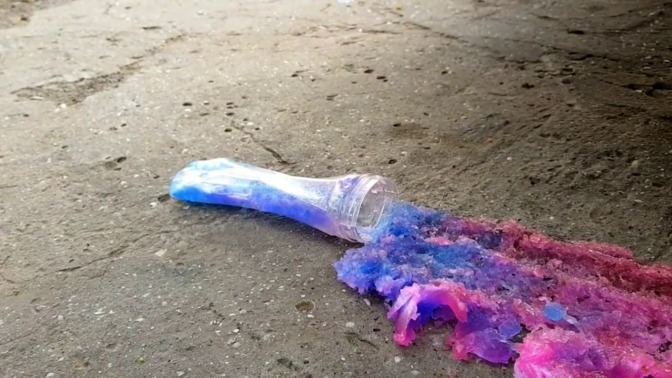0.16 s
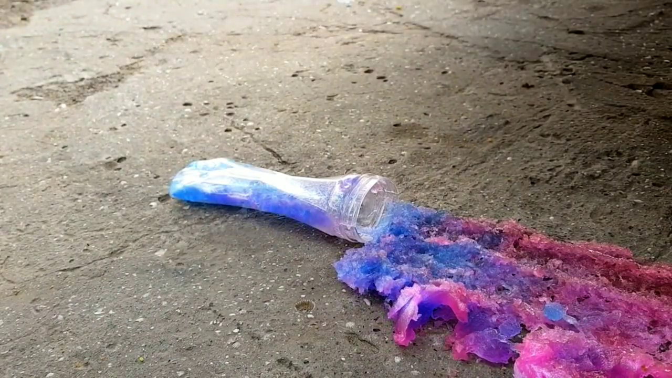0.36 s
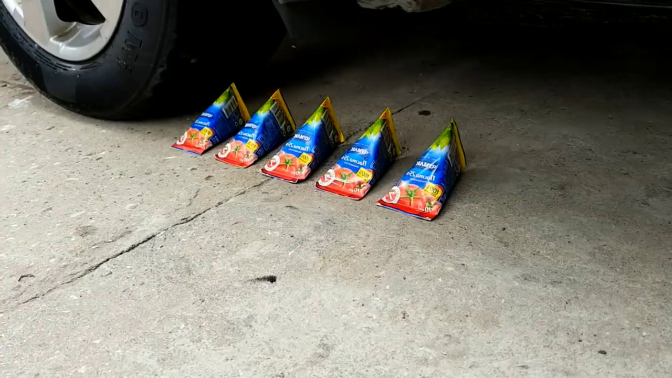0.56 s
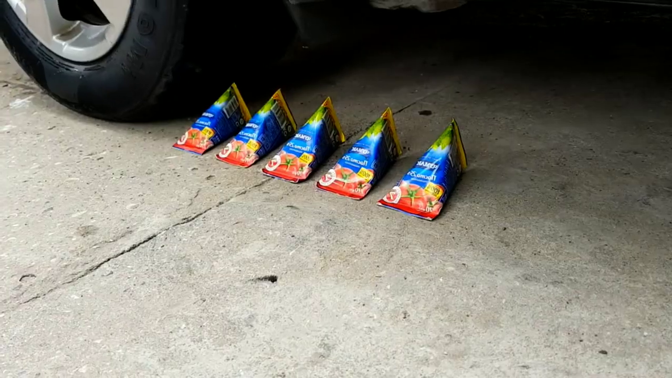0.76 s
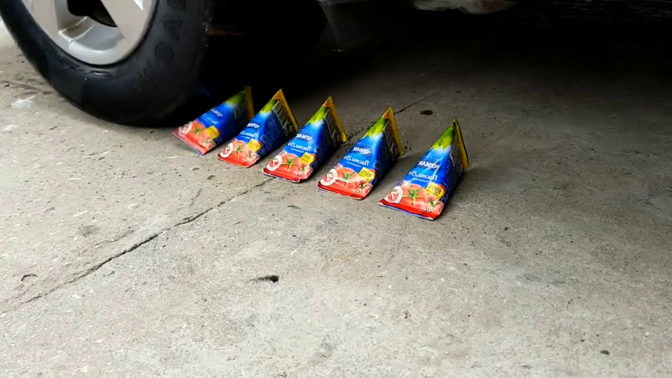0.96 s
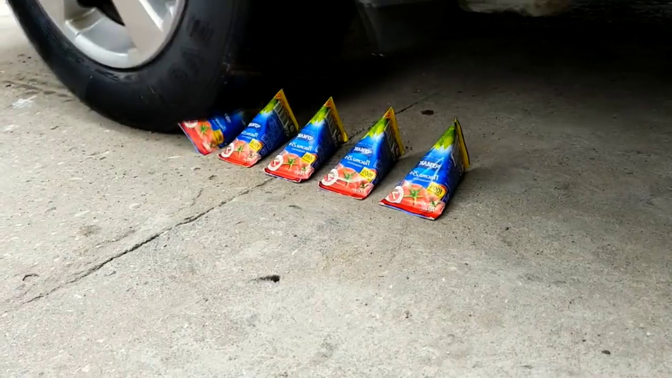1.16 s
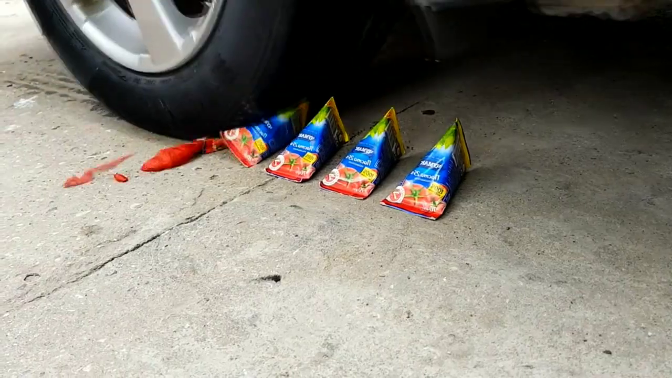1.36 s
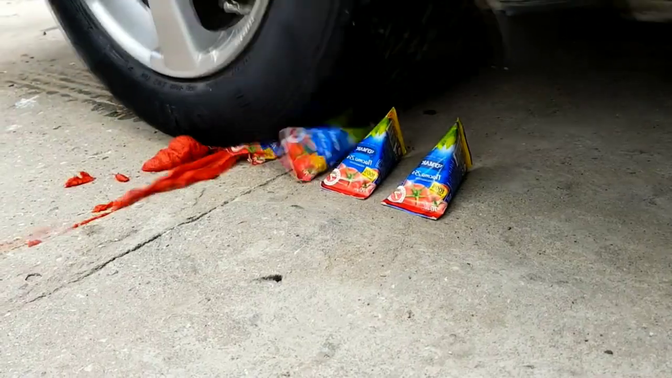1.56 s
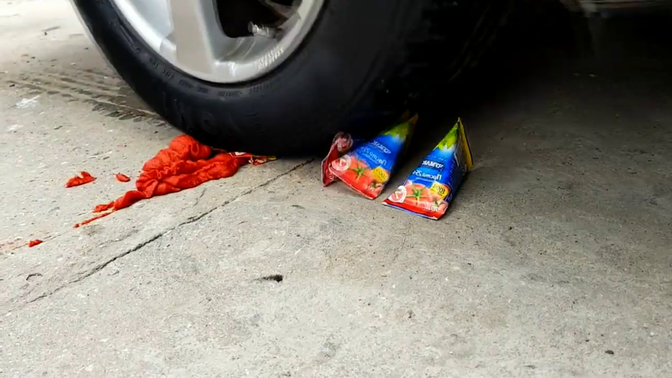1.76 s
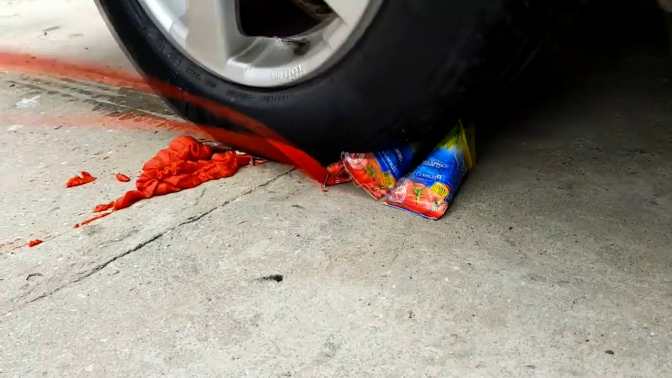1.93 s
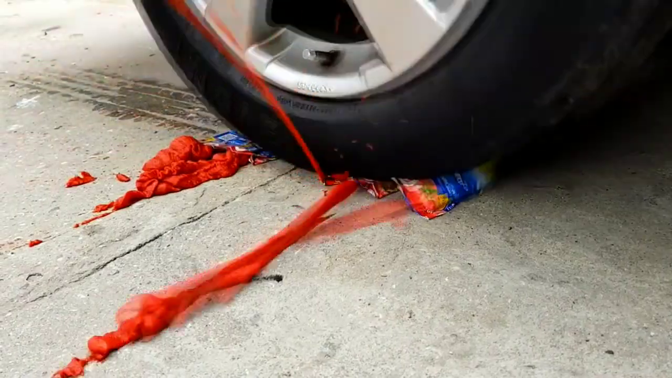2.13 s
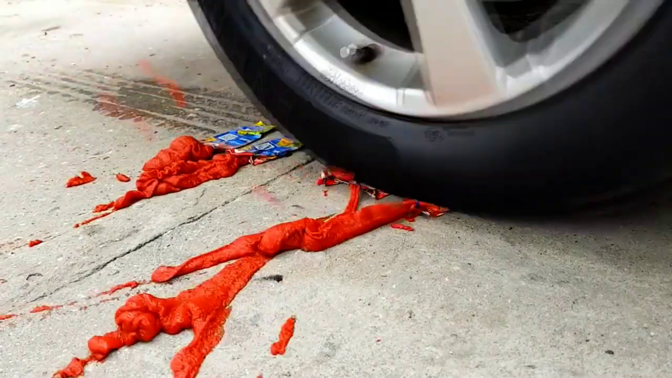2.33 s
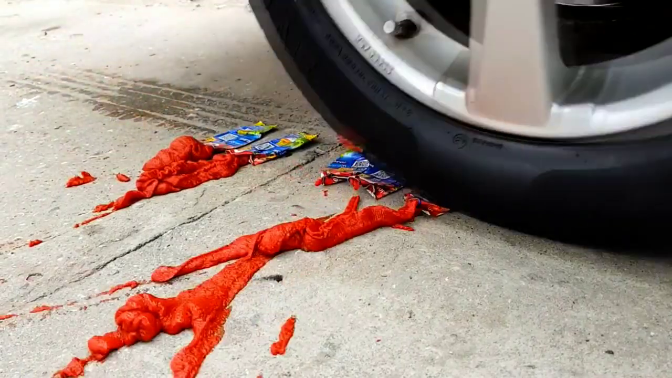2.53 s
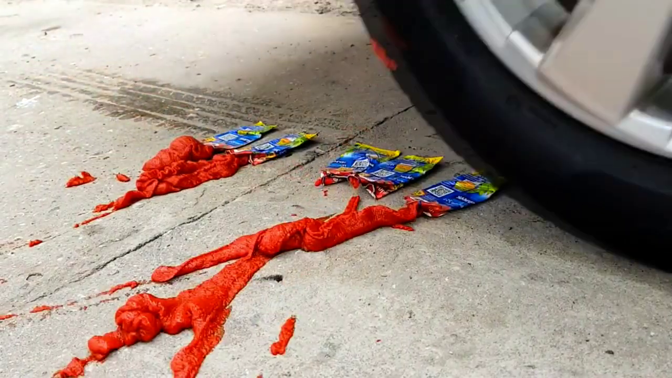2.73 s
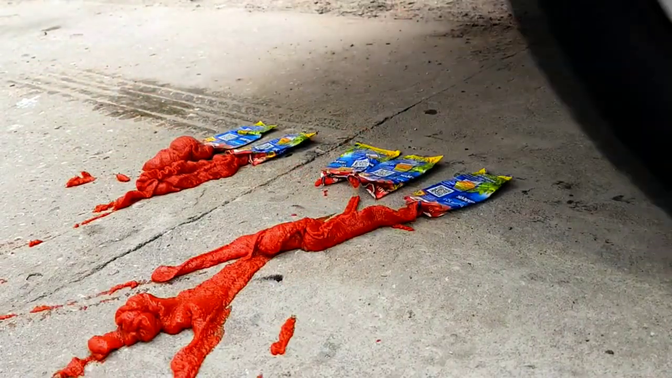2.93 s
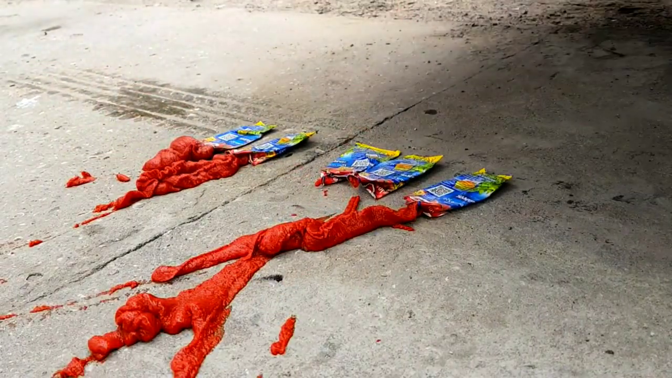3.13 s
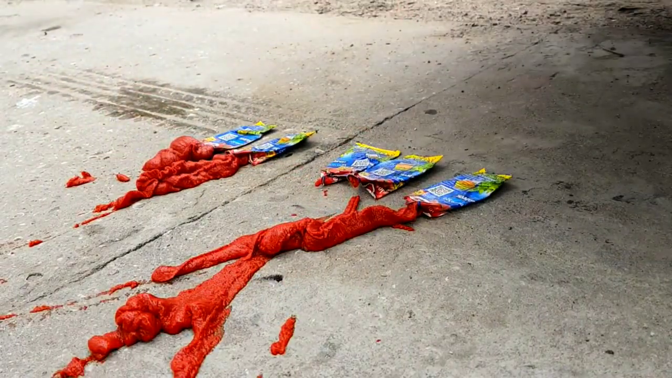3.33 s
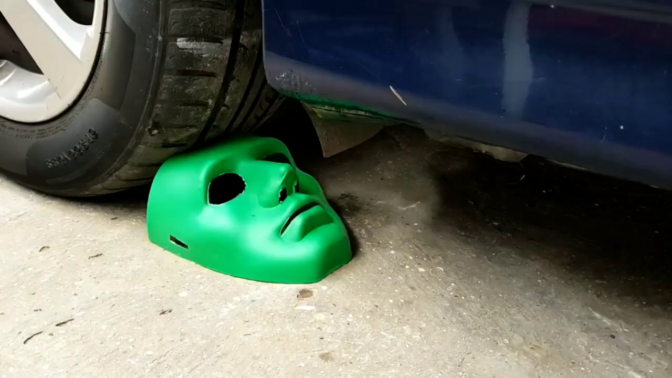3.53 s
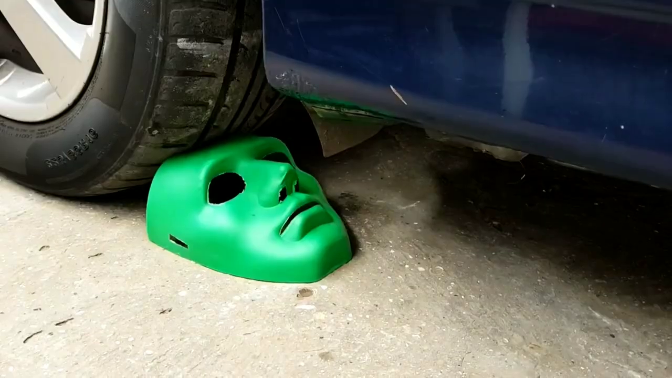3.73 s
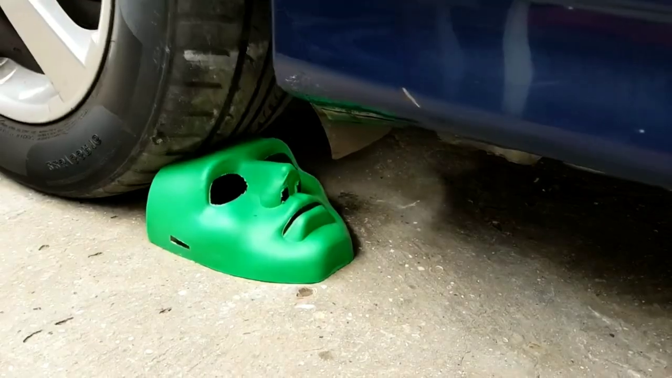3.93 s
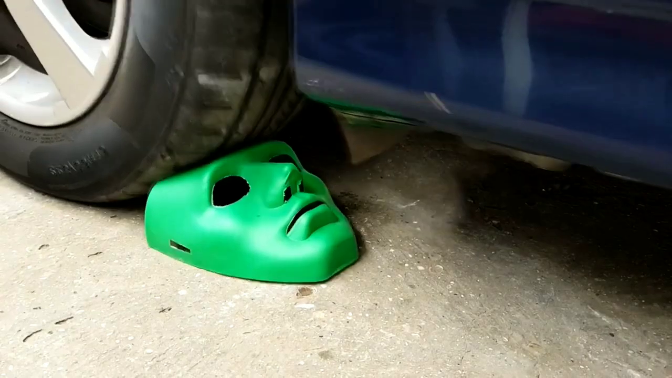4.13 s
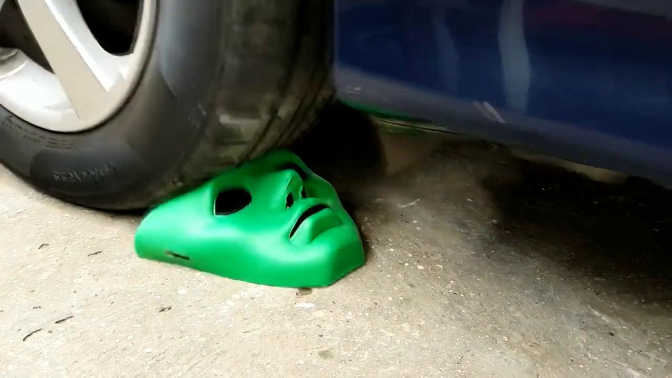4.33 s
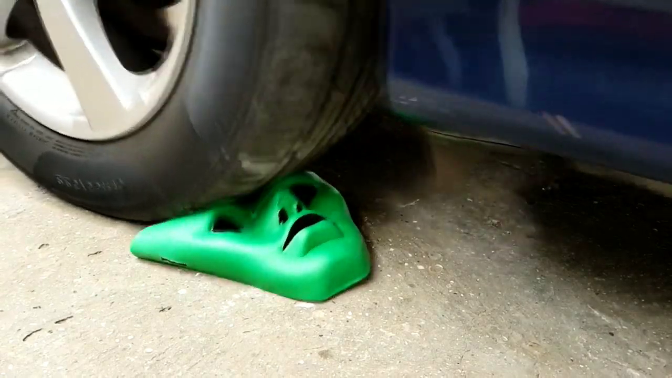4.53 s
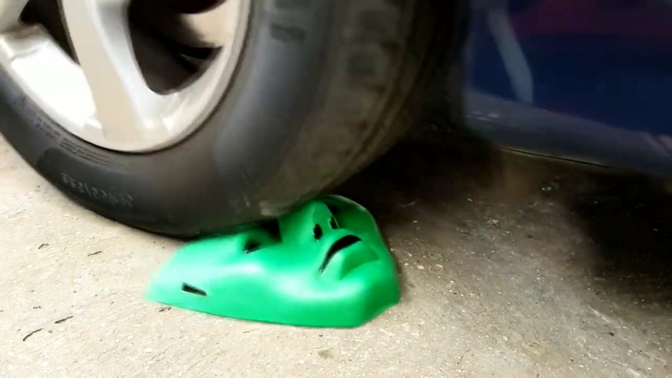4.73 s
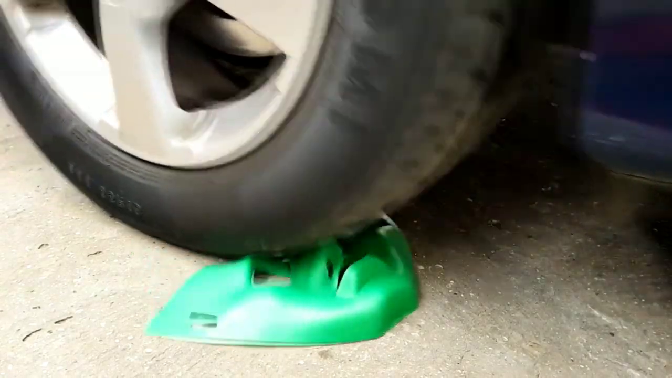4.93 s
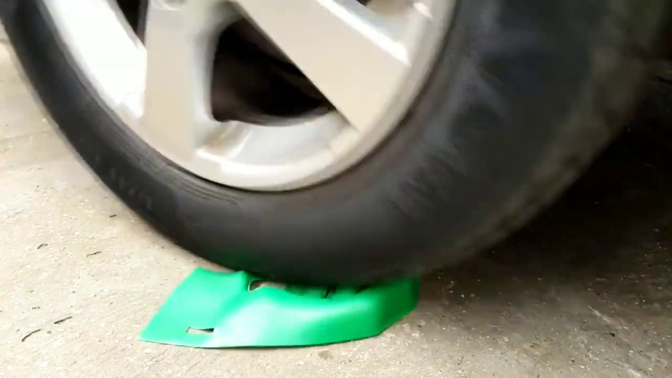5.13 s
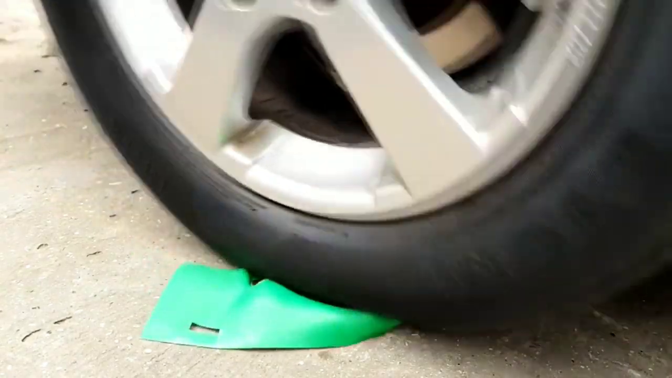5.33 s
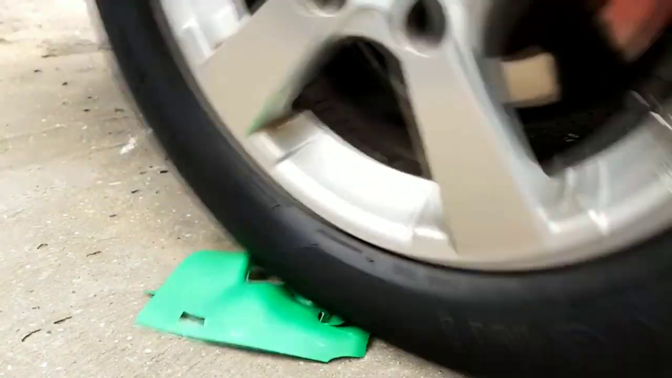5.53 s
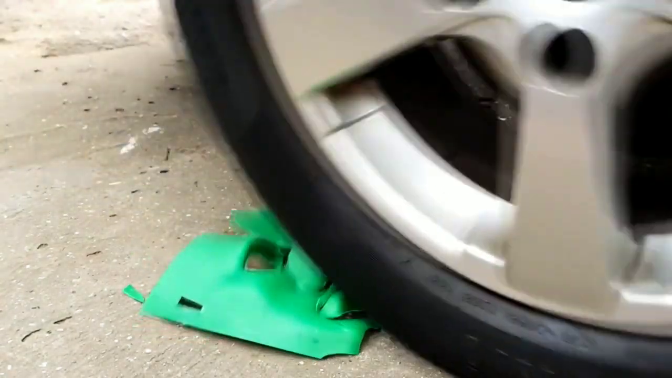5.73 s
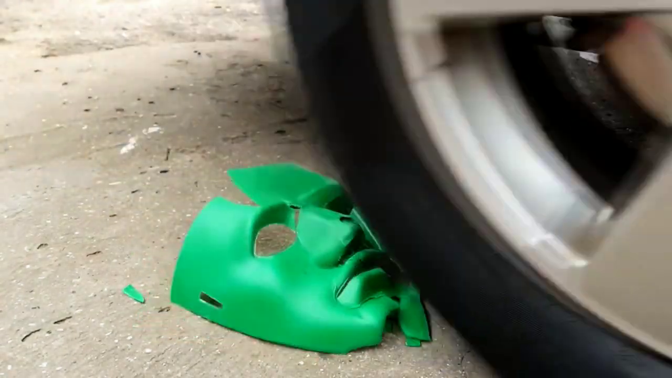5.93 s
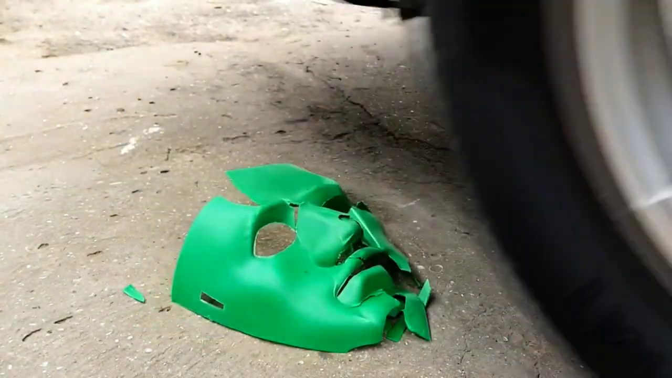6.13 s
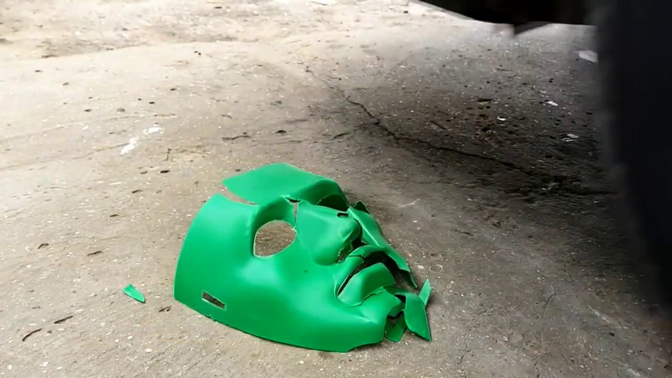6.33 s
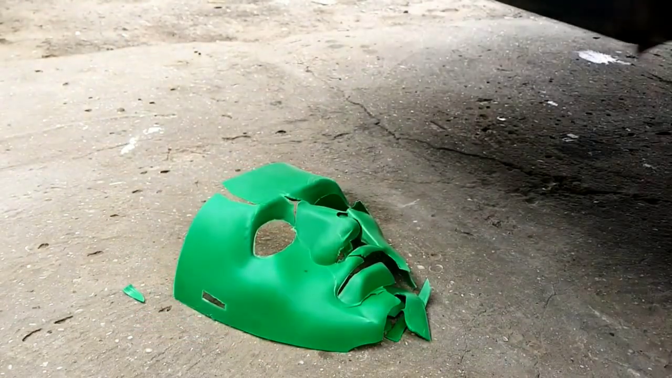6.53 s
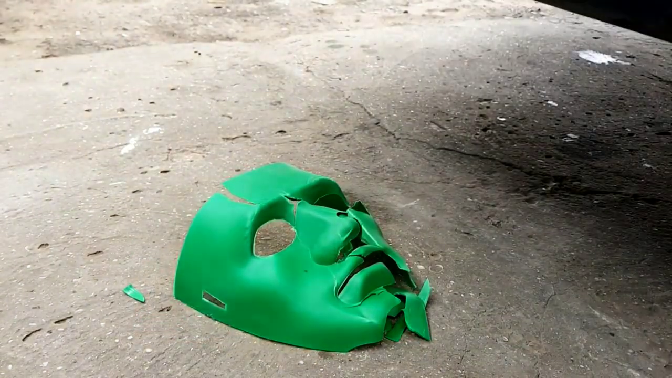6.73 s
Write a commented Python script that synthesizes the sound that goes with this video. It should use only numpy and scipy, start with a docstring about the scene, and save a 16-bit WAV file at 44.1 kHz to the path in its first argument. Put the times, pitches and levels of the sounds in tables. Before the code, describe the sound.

Close to the ground on concrete, a car creeps past with a low idling hum and soft tyre rumble. Foil packets tick, squelch and pop, one bursting with a duller thump. After an abrupt cut, a hard plastic mask scrapes, groans under load, then breaks in a loud, hollow volley of cracks and thumps. The wheel rolls off, the car fades, and one dry plastic click remains.

```python
"""On concrete, a car creeps along with its engine idling while its tyre crushes things laid in the way.
A row of sauce packets crinkles and pops: damped mode clusters and dense click trains, filtered.
A thin plastic mask then buckles, crunches and splits in a volley of cracks over thumping panels.
The tyre drops off it and rings, and a last piece of plastic clicks, both as sums of damped modes.
Beneath, in three shots cut together, lie the engine's sine orders and shaped noise of road and tread."""
import sys
import numpy as np
from scipy import signal
from scipy.fft import rfft, irfft, next_fast_len
from scipy.io import wavfile
from scipy.ndimage import map_coordinates

SR = 44100
rng = np.random.default_rng(int(sys.argv[2]) if len(sys.argv) > 2 else 0)


def file_out(sig):
    """Save sig as 16-bit WAV at sys.argv[1]."""
    # one column per channel
    cols = np.atleast_2d(sig).T
    # limit, then scale
    lim = np.clip(cols, -1, 1)
    pcm = np.round(lim * 32767).astype(np.int16)
    wavfile.write(sys.argv[1], SR, pcm)


N = 298998
TIME = np.arange(N) / SR

# The mask cracking. Each row: time in seconds, relative level in dB, pitch of the knock in Hz,
# brightness in dB, duration of the running split in seconds, relative level in dB of the thump
# of the panel snapping through, pitch of that thump in Hz at its onset.
CRACKS = [(4.056, -28.5, 1011, 0.5, 0.0045, -22.5, 590), (4.1185, -24.5, 1002, -7.5, 0.009, -17.5, 594),
          (4.208, -9, 871, -13, 0.002, -14, 720), (4.286, -21, 1388, -3.5, 0.0021, -25.5, 705),
          (4.294, -32, 1710, 13.5, 0, -21.5, 700), (4.323, -23.5, 1170, -5, 0.0019, -20.5, 670),
          (4.333, -20.5, 1630, -8.5, 0.0015, -19, 560), (4.342, -19, 1630, -7, 0.00036, -21, 686),
          (4.351, -21, 1180, -5.5, 0.0002, -9.5, 780), (4.357, -21.5, 1150, -2.5, 0.0052, -10.5, 644),
          (4.379, -22, 1202, -11.5, 0.018, -21.5, 600), (4.396, -13.5, 1185, -6.5, 0, -8, 664),
          (4.408, -12, 2300, -6.5, 0.0023, -4, 680), (4.419, -22, 1790, -9, 0.0029, -13.5, 575),
          (4.436, -17, 1190, -11.5, 0.0046, -17, 549), (4.442, -23.5, 1180, -12.5, 0.00071, -17, 506),
          (4.456, -19, 1280, -13, 0.00061, -17, 620), (4.473, -26.5, 1198, -10, 0.005, -17, 597),
          (4.492, -27.5, 1197, -8.5, 0.00089, -16.5, 548), (4.526, -34.5, 1506, -5.5, 0.002, -25, 717),
          (4.546, -32.5, 1191, -1.5, 0, -30.5, 718), (4.5862, -17, 1500, 3, 0.026, -27, 694),
          (4.669, -13, 1150, 0, 0.017, -10, 600), (4.686, -17.5, 1000, -6, 0.0064, -2, 620.3),
          (4.697, -16.5, 1050, -4.5, 0.006, -6.5, 635), (4.732, -24.5, 1090, -21.5, 0.0045, -15, 600.7),
          (4.789, -27, 902, -18.5, 0.001, -17.5, 785), (4.809, -25, 1150, -23.5, 0.0011, -15.5, 700),
          (4.82, -30.5, 1050, -22.5, 0.00061, -24.5, 640), (4.834, -25, 1189, -14.5, 0.0033, -19.5, 788.6),
          (4.845, -21.5, 1280, -11.5, 0.0045, -22, 796), (4.882, -18, 1041, -11.5, 0.004, -12, 634.4),
          (4.895, -12.5, 1760, -9, 0, -4.5, 696), (4.905, -23, 1450, -17.5, 0, -28, 695),
          (4.923, -15, 1390, 2.5, 0.012, -11.5, 762), (4.96, -9, 1376, -10, 0.00072, -18, 990),
          (4.968, -21.5, 1980, -12, 0.00022, -26.5, 700), (4.978, -16, 2297, 2, 0.0012, -16.5, 800),
          (5.039, -20, 2135, 0, 0.00099, -15, 513), (5.057, -31, 1253, 2, 0.0017, -33.5, 700),
          (5.079, -21.5, 1709, 7, 0, -27, 800), (5.094, -13, 1446, -1.5, 0.00082, -12.5, 1030),
          (5.1454, -30, 1500, 15, 0.0033, -27.5, 450), (5.161, -23.5, 1454, 0.5, 0.0004, -22, 700),
          (5.177, -14, 1468, -3.5, 0.0073, -16.5, 560), (5.193, -18, 1550, 2.5, 0.028, -23, 650),
          (5.211, -19, 1505, -1, 0.0019, -23.5, 700), (5.232, -22, 1177, -13.5, 0.0027, -21.5, 838.6),
          (5.265, -19.5, 1099, -25, 0.0009, -14, 800), (5.287, -26, 1189, -14.5, 0.0031, -17.5, 1033),
          (5.326, -23.5, 1109, 8.5, 0.0011, -8, 720), (5.336, -21, 890, -5, 0.0044, -6.5, 721),
          (5.398, -15, 906, 1.5, 0.0013, -4.5, 642), (5.416, -24.5, 1182, 5.5, 0.025, -26, 806),
          (5.425, -24.5, 1000, -3, 0.00054, -17, 640), (5.4698, -13.5, 852.6, 0, 0.017, -19, 560),
          (5.478, -14.5, 760, -1, 0.008, -21, 480), (5.498, -19.5, 601.5, 2, 0.017, -4, 747),
          (5.546, -34, 1793, 7, 0.0026, -32, 750), (5.698, -35, 1915, 3.5, 0.0065, -50, 611),
          (5.735, -45, 2205, 9, 0.0003, -47, 698), (5.811, -40, 2350, 1.5, 0.0058, -58, 700)]
# Knock, crack and tick of hard plastic. Each row: relative level in dB, decay time t60 in seconds.
MASK_VOICES = [(-1.5, 0.021), (-2.5, 0.008), (-1.5, 0.007)]
# Colour of breaking plastic. Each row: frequency in Hz, gain in dB.
PLASTIC_COLOUR = [(30, -18), (150, 2), (360, -5.5), (500, -6), (650, -1), (920, -4), (1300, -3),
                  (2000, -1.5), (3200, -2.4), (4500, -3.5), (6800, -3.5), (8500, -6), (12000, -1),
                  (15500, -5.5)]
# Hollow resonances of the mask. Each row: frequency in Hz, bandwidth in Hz, relative gain in dB.
SHELL_RESONANCES = [(640, 90, -10.5), (1180, 75, -8.5), (1256, 24, -7.5), (1530, 20, -13), (1800, 74, -14),
                    (3000, 53, -10.5)]
# The shell folds in swells of small buckles.
# Each row: time of the height in seconds, length in seconds, relative level in dB, pitch in Hz.
FOLDS = [(3.759, 0.028, -34.5, 750), (3.843, 0.037, -44, 602), (4.365, 0.03, -27, 1100),
         (4.426, 0.054, -31, 1015), (4.529, 0.066, -32.5, 1000), (4.717, 0.0441, -33.5, 902.2),
         (4.823, 0.047, -41.5, 858), (4.944, 0.053, -40.5, 1399), (5.115, 0.029, -26.5, 1497),
         (5.236, 0.03, -32, 1400), (5.513, 0.019, -23.5, 749.5)]
# Spectrum of the tearing fibres. Each row: frequency in Hz, relative density in dB per Hz.
FIBRE_SPECTRUM = [(200, -12.5), (450, 6.5), (1000, -4), (3000, 4.5), (6000, -0.5), (16000, -23)]
# The mask scrapes on the concrete, as the tyre grips it and as it settles.
# Each row: start in seconds, length in seconds, level in dB, tilt in dB per octave.
SCRAPES = [(3.742, 0.033, -40, -6.5), (3.8, 0.066, -45.5, -10), (5.84, 0.13, -54.5, -6.5)]
# Band of the shell's upper ring: lower and upper edge in Hz.
UPPER_RING_BAND = (1420, 3238)
# The break travels from right to left. Each row: time in seconds, lag of the left ear in seconds.
BREAK_LAG = [(4.35, .00007), (5.5, -.00006)]

# Packets popping and grit snapping under the tread; the last two rows are dull knocks of settling debris.
# Each row: time in seconds, relative level in dB, pitch of the knock in Hz, brightness in dB.
POPS = [(.551, -44.5, 930, -3.5), (1.335, -41.5, 670, -12), (1.348, -39, 656, -5.5),
        (1.448, -37, 1000, -12), (1.497, -38.5, 830, -25), (1.588, -31.5, 800, -4), (1.692, -37, 880, -5),
        (1.76, -49, 1497, 12.5), (1.797, -49, 1490, 7), (1.814, -37, 840, -11), (1.866, -42, 698, 8),
        (1.895, -43, 1224, 11), (1.93, -36.5, 910, 0), (2.064, -32.5, 754, -9), (2.08, -36.5, 720, 1),
        (2.183, -40.5, 910, 5.5), (2.217, -33, 764, -1), (2.278, -55, 1499, 15), (2.35, -47.5, 1205, 7),
        (2.444, -39, 810, -9), (2.773, -52, 1202, 13.5), (2.829, -47, 2853, 6), (2.922, -49, 1600, 16.5),
        (2.957, -37.5, 980, -2.5), (3.087, -53, 1840, 17), (3.377, -44.5, 887, 6.5),
        (6.02, -53.5, 1200, -8), (6.103, -55, 1300, -12)]
# Knock, crack and tick of foil. Each row: relative level in dB, decay time t60 in seconds.
FOIL_VOICES = [(-1.5, 0.0225), (-12, 0.028), (-17, 0.0086)]
# Soft filling squelching and spraying through a split seam.
# Each row: start in seconds, length in seconds, relative level in dB, tilt in dB per octave.
SQUIRTS = [(0.0, 0.022, -39.5, -10.5), (1.34, 0.012, -39.5, -10.5), (1.447, 0.015, -37.5, -16.5),
           (1.885, 0.033, -46, -6), (1.96, 0.28, -53, -6.5), (2.06, 0.13, -72, -9),
           (2.065, 0.014, -48, -20), (2.443, 0.012, -37, -15)]
# Colour of the packets. Each row: frequency in Hz, gain in dB.
FOIL_COLOUR = [(200, 17.5), (450, 3), (800, -2.5), (1500, -2), (4000, 3), (9000, 6), (15000, 17)]
# Sealed packets bursting. Each row: start in seconds, thump in dB, spit of escaping air in dB.
BANGS = [(1.5882, -30, -58), (2.2181, -18, -30)]
# Pressure pulse of a burst. Each row: frequency in Hz, relative level in dB, t60 in seconds.
BANG_MODES = [(294, -3, 0.018), (550, -6.5, 0.022)]

# Bent shards snap back. Each row: start in seconds, level in dB.
CLICKS = [(5.923, -37), (6.366, -17)]
# Modes of a shard. Each row: frequency in Hz, relative level in dB, t60 in seconds.
SHARD_MODES = [(983.2, -10, 0.009), (1741.9, 0, 0.0038), (2240, -1, 0.0065), (3220, -3.5, 0.0027),
               (3780, -1.5, 0.0015), (4920, -4, 0.0029), (5550, -7.5, 0.0041), (8120, -19, 0.001901),
               (10100, -24, 0.0012)]
# A hard tube pings. Each row: start in seconds, level in dB.
PINGS = [(0.0, -37)]
# Modes of the tube. Each row: frequency in Hz, relative level in dB, t60 in seconds.
TUBE_MODES = [(1830, 2, 0.085), (2170, 1, 0.087), (2460, -1, 0.085), (1940, -14, 0.041)]
# Colour of the echo of shards and tube. Each row: frequency in Hz, gain in dB.
PIECE_ECHO_COLOUR = [(2000, -2.5), (3800, 7), (5400, -5), (8000, 0)]

# Jolts of the tyre. Each row: start in seconds, thud in dB, ring of the air inside in dB.
JOLTS = [(0.001, -22.5, -79), (0.553, -26.5, -54), (1.341, -27.5, -49), (1.588, -27, -38.5),
         (1.618, -31, -42), (2.218, -37, -40), (3.777, -26.5, -52.5), (3.839, -26.5, -55),
         (3.873, -25.5, -49.5), (5.191, -37.5, -38), (5.479, -28, -26.5)]
# Modes of the tyre carcass. Each row: frequency in Hz, relative level in dB, t60 in seconds.
CARCASS_MODES = [(67, 4.5, 0.094), (88, 3.5, 0.09), (131, 0.5, 0.026), (172.4, -8.5, 0.19),
                 (264, -24, 0.085)]
# Modes of the air inside the tyre. Each row: frequency in Hz, relative level in dB, t60 in seconds.
AIR_MODES = [(223, 1.5, 0.88), (329, -2, 0.15), (247.5, 2, 0.3)]

# Three shots cut together, each with its own engine and road levels; the firing tone also drifts
# within each. Each row: start in seconds, firing tone in dB at the start, its drift in dB per second,
# octave in dB, rumble in dB, tread noise in dB, hiss in dB.
SHOTS = [(0, -41, 3, -44.5, -45.5, -54.5, -66.5), (0.539, -45.5, 3, -44.5, -42, -45.5, -55),
         (3.65, -52, -1.5, -49, -41.5, -45, -54.5)]
# Engine speed. Each row: time in seconds, firing rate in Hz.
IDLE_SPEED = [(.3, 37.19), (1.2, 38.55), (1.8, 38.11), (2.6, 39), (3.6, 38.47), (6.78, 37.47)]
# Higher engine orders. Each row: multiple of the firing rate, level in dB against the octave.
ENGINE_ORDERS = [(3, -11), (4.5, -9.5), (5, -12.5), (6, -9.5), (10, -17)]
# Load on the tyre as it climbs the mask; below 0 dB it lowers the rumble, above it brings the groan.
# Each row: time in seconds, load in dB against the rumble.
TYRE_LOAD = [(3.68, -0.5), (3.82, 8.5), (3.98, 3), (4.2, 12), (4.45, 7.5), (4.8, -2)]
# Spectrum of the rumble. Each row: frequency in Hz, relative density in dB per Hz.
RUMBLE_SPECTRUM = [(25, -26.5), (50, 2.5), (90, 4), (125, 1), (170, 4.5), (220, 2), (290, -0.5), (420, -9),
                   (700, -47)]
# Groan of the loaded tyre. Each row: frequency in Hz, relative density in dB per Hz.
GROAN_SPECTRUM = [(30, -23.5), (70, 3), (110, 3.5), (170, 6.5), (260, -6), (420, -7), (700, -41)]
# Spectrum of the tread noise. Each row: frequency in Hz, relative density in dB per Hz.
TREAD_SPECTRUM = [(250, -20.5), (420, 1.5), (620, 4.5), (950, 1), (1400, -3.5), (2100, -6.5), (3200, -13),
                  (5000, -32)]
# Spectrum of the hiss. Each row: frequency in Hz, relative density in dB per Hz.
HISS_SPECTRUM = [(2200, -11), (3600, 5), (5200, 3), (7200, 3.5), (8500, -2), (11500, 1.5), (15500, -6.5)]

# Air squeezed from under the mask buffets the microphones.
# Each row: start in seconds, length in seconds, level in dB.
PUFFS = [(4.586, 0.024, -26), (5.192, 0.031, -31.5), (5.468, 0.0314, -23)]
# Spectrum of a puff. Each row: frequency in Hz, relative density in dB per Hz.
PUFF_SPECTRUM = [(20, -13), (45, -1.5), (80, -5.5), (160, -16), (400, -30.5), (1500, -62)]

# Reverberation under the car. Each row: frequency in Hz, t60 in seconds.
REVERB_DECAY = [(300, 0.32), (1000, 0.13), (3000, 0.24), (7000, 0.2), (14000, 0.11)]
# How strongly nearby surfaces throw sound back. Each row: frequency in Hz, gain in dB.
REFLECTION = [(250, -7), (650, -1), (1500, 1), (4000, 0.5), (14000, 5)]
# Left-right likeness of noise and echoes. Each row: frequency in Hz, likeness from 0 to 1.
LIKENESS = [(40, 1), (250, 1), (800, 0.7), (2000, 0.6), (5000, 0.1), (15000, 0.01)]

# A split starts this long after its crack's table time; its level is set against the crack.
SPLIT_DB, SPLIT_DELAY_S = -0.5, .003
SPLIT_TILT, SPLIT_TILT_FOLLOWS = -3, 0.22   # dB per octave, and its rise per dB of brightness
CRACK_SHARE = 0.55   # share of the brightness that reaches the middle voice
SPIKE_DB, SPIKE_S = 5, .00004   # scale of a crack's pressure spike against the crack, and its width
SPLINTERS_PER_S, SPLINTER_DB, SPLINTER_T60_S = 430, 0, 0.28
SPLINTER_SPREAD_DB = 2.5   # how much the splinters differ in size
BUCKLES_PER_S, STRAY_BUCKLES_PER_S = 330, 30   # rate at the height of a fold, and between folds
BUCKLE_FLOOR_DB = -53.5   # size of the stray buckles
FIBRES_DB = -2.5   # fine tearing, set against the folds
# The mask is pressed flat: its hollow ring fades, and its upper ring is damped.
FLATTEN_FROM_S, FLAT_S = 4.2, 5.35
HOLLOW_DB, FLAT_HOLLOW_DB, FLAT_RING_DB = 5.5, -16.5, -4
FLIP_DB, FLIP_RISE_S, FLIP_T60_S = -2, 0.0004, 0.015   # thump of a panel snapping through
FLIP_SAG, FLIP_SAG_S = 0.084, 0.0072   # its pitch falls by this share, this quickly
SPIT_HZ, SPIT_T60_S = 8800, 0.004   # lower edge of the spit of air, and its decay at that edge
CRACK_THUD_DB = -28.5   # each crack lets the tyre sink: its thud against the crack
TREAD_FOLLOWS_LOAD = 0.34   # share of the load's dB in the tread noise and hiss
# The wheel rolls away and the car fades to a distant idle.
LEAVES_S, GONE_S = 5.48, 6.156
GONE_UPPER_DB, GONE_RUMBLE_DB, GONE_TREAD_DB = -12, -12.5, -17.5
TREAD_LIFTS_S = 5.37   # the tread noise fades earlier, as the tyre rides up on the plastic
GRIT_DB = -15.5   # grit ticking under the tread, against the hiss
CAR_LAG_S = .00045   # the car's sound reaches the right ear this much later
CAR_LEAN_DB, PLASTIC_LEAN_DB = 1.08, 1.0   # added on the left, taken off the right
MODE_JITTER_S = .00012   # modes start this close together, so the low ones add up to one clean snap
SHIFT_S = 0.03   # the echoes change this often, as the wheel turns and the break moves on
CUTOFF_HZ = 16100


def mask():
    """Fracture and buckling excite a hollow shell, whose resonances colour them; its panels thump."""
    cracks = fractures(CRACKS, MASK_VOICES, apart_hz=2660)
    buckles = from_db(-5.5) * crumple(octaves=0.97, t60=0.013)
    running = [(s + SPLIT_DELAY_S, length, db + SPLIT_DB, SPLIT_TILT + SPLIT_TILT_FOLLOWS * bright_db)
               for s, db, _, bright_db, length, *_ in CRACKS if length > 0]
    splits = runs(running, per_s=2000, spread_db=2, apart=1.05, rise=0.065)
    scrapes = runs(SCRAPES, per_s=380, spread_db=8.5, apart=0.97, rise=0.25)
    breaking = cracks + splinters(apart=0.97) + buckles + splits + scrapes
    sound = colour(breaking, PLASTIC_COLOUR)
    hollow = sum(from_db(db) * signal.lfilter(*signal.iirpeak(hz, hz / width, fs=SR), sound)
                 for hz, width, db in SHELL_RESONANCES)
    flatness = ramp(FLATTEN_FROM_S, FLAT_S)
    hollow = hollow * from_db(HOLLOW_DB + (FLAT_HOLLOW_DB - HOLLOW_DB) * flatness)
    moving = travelling(pressed(sound) + hollow + flips())
    return room(moving, wet_db=-34.0, scatter_db=-28.5, scatter_t60=0.021)


def fractures(rows, voices, apart_hz):
    """Damped modes of a sudden blow: a knock at the given pitch, under a crack and tick raised by brightness."""
    out = np.zeros((2, N))
    for s, db, hz, bright_db, *_ in rows:
        bands = [(hz / 2, hz * 2, 0), (1200, 6000, CRACK_SHARE), (2900, 20000, 1)]
        for (low, high, share), (trim_db, t60) in zip(bands, voices):
            level = from_db(db + share * bright_db + trim_db)
            add(out, s + .001, level * snap(low, high, t60, apart_hz))
    return out


def snap(low, high, t60, apart_hz, count=24, rise_s=0.00051):
    """A sudden release rings a random cluster of damped modes, with the energy of rms 1 over 5 ms."""
    t = TIME[:SR // 20]
    place = ((np.arange(count) + rng.random(count)) / count)[:, None]
    hz = low * (high / low) ** place
    jitter = 2 * np.pi * hz * MODE_JITTER_S * rng.standard_normal((count, 1))
    # the higher a mode, the more its phase differs between the ears
    ear_phase = np.minimum(hz / apart_hz, 2) * rng.standard_normal((2, count, 1))
    decay = np.exp(-np.log(1000) * t / t60 * np.sqrt(hz / low))
    modes = np.sin(2 * np.pi * hz * t + jitter + ear_phase) * decay
    weighted = modes * np.sin(np.pi * place)   # strongest mid-cluster
    sound = weighted.sum(axis=1) * (1 - np.exp(-t / rise_s))
    return sound / np.sqrt(np.sum(sound ** 2) / (2 * .005 * SR))


def splinters(apart):
    """Sudden release gives a two-sided pressure spike, and sparse decaying ticks; brightness raises both."""
    out, t = np.zeros((2, N)), TIME[:SR // 5]
    x = (TIME[:SR // 200] - .002) / SPIKE_S   # the spike is centred 2 ms in
    for s, db, _, bright_db, *_ in CRACKS:
        add(out, s, from_db(db + bright_db + SPIKE_DB) * x * np.exp(-x ** 2))
        chosen = rng.random(len(t)) < SPLINTERS_PER_S / SR
        heights = rng.standard_normal(len(t)) + apart * rng.standard_normal((2, len(t)))
        spread = np.clip(rng.standard_normal(len(t)), -2, 1.5) - .5
        ticks = chosen * heights * from_db(SPLINTER_SPREAD_DB * spread)
        decay = np.exp(-np.log(1000) * t / SPLINTER_T60_S)
        add(out, s, from_db(db + bright_db + SPLINTER_DB) * ticks * decay)
    return out


def crumple(octaves, t60):
    """Crumpling is a random train of small buckles, each a knock of its own pitch, over tearing fibres."""
    pace, strength, centre_hz = folding()
    on_mask = (TIME > FOLDS[0][0]) & (TIME < FOLDS[-1][0])
    per_s = BUCKLES_PER_S * pace + STRAY_BUCKLES_PER_S * on_mask
    heights = rng.standard_normal(N) + 0.63 * rng.standard_normal((2, N))
    grains = (rng.random(N) < 2500 / SR) * heights
    out = from_db(FIBRES_DB) * strength * rms_one(colour(grains, FIBRE_SPECTRUM))
    for at in np.flatnonzero(rng.random(N) < per_s / SR):
        hz = centre_hz[at] * 2 ** (octaves * rng.uniform(-1.1, 1))
        size = (strength[at] + from_db(BUCKLE_FLOOR_DB)) * (.5 + rng.random())
        add(out, at / SR, size * snap(hz / 2, hz * 2, t60, apart_hz=1980, count=7))
    return out


def folding():
    """Folding swells as a bell curve in time: the pace, size and pitch of its buckles at every sample."""
    swells = np.array([np.exp(-((TIME - s) / length) ** 2) for s, length, *_ in FOLDS])
    s, _, db, hz = np.transpose(FOLDS)
    return swells.sum(axis=0), from_db(db) @ swells, np.interp(TIME, s, hz)


def runs(rows, per_s, spread_db, apart, rise):
    """A running split is a dense train of uneven clicks, swelling over a share of its length."""
    out, t = np.zeros((2, N)), TIME[:SR // 4]
    for s, length, db, tilt in rows:
        spread = spread_db * np.clip(rng.standard_normal(len(t)), -2, 2)
        sizes = from_db(spread) * (rng.random(len(t)) < per_s / SR)
        signs = rng.choice([-1, 1], len(t)) + apart * rng.choice([-1, 1], (2, len(t)))
        envelope = (1 - np.exp(-t / (rise * length))) * np.exp(-(t / length) ** 4)
        slope = [(200, -24), (550, 0), (1000, 0), (16000, tilt * np.log2(16))]
        sound = colour(sizes * signs * envelope, slope)
        add(out, s, from_db(db) * sound / np.sqrt(np.sum(sound ** 2) / (2 * length * SR) + 1e-20))
    return out


def flips():
    """Snap-through of a panel pushes the air in a few swings, sagging in pitch as the strain lets go."""
    out, t = np.zeros(N), TIME[:SR // 20]
    for s, *_, db, hz in CRACKS:
        turns = np.cumsum(hz * (1 + FLIP_SAG * (np.exp(-t / FLIP_SAG_S) - 1))) / SR
        swing = np.sin(2 * np.pi * turns) * np.exp(-np.log(1000) * t / FLIP_T60_S)
        add(out, s + 0.00087, from_db(db + FLIP_DB) * swing * (1 - np.exp(-t / FLIP_RISE_S)))
    return out


def pressed(sound):
    """Contact damping: lying flat on the concrete, the shell loses some of its upper ring."""
    band = signal.butter(1, UPPER_RING_BAND, "band", fs=SR, output="sos")
    upper = signal.sosfilt(band, sound)
    return sound + upper * (from_db(FLAT_RING_DB * ramp(FLATTEN_FROM_S, FLAT_S) ** 4) - 1)


def travelling(x):
    """Interaural delay: the breaking point moves across the mask, and the lag of the left ear with it."""
    lag, = in_time(BREAK_LAG)
    return np.array([map_coordinates(x[0], [(TIME - lag) * SR], order=5), x[1]])


def packets():
    """Foil, grit and debris knock as damped mode clusters; filling sprays as click trains; some packets burst."""
    pops = fractures(POPS, FOIL_VOICES, apart_hz=3754.0)
    spray = runs(SQUIRTS, per_s=3700, spread_db=4.0, apart=0.74, rise=0.17)
    foil = colour(pops + spray, FOIL_COLOUR)
    return room(foil, wet_db=-26, scatter_db=-53, scatter_t60=0.03) + bangs()


def bangs():
    """Sudden pressure release: a low damped thump and a thin spit of air, both without echo."""
    out = strike([(s, db) for s, db, _ in BANGS], BANG_MODES) * np.ones((2, 1))
    for s, _, spit_db in BANGS:
        spit = snap(SPIT_HZ, 2 * SPIT_HZ, SPIT_T60_S, apart_hz=2 * SPIT_HZ)
        add(out, s, from_db(spit_db) * spit)
    return out


def loose_pieces():
    """Free vibration of struck hard plastic, as damped modes, with a coloured answer from the space."""
    sound = (strike(CLICKS, SHARD_MODES) + strike(PINGS, TUBE_MODES)) * np.ones((2, 1))
    answer = room(sound, wet_db=-36, scatter_db=-19.5, scatter_t60=0.019, count=1) - sound
    return sound + colour(answer, PIECE_ECHO_COLOUR)


def tyre():
    """Impulse response: jolts thump the carcass and ring the air inside; cracks thump it lightly."""
    thuds = [(s, db) for s, db, _ in JOLTS] + [(s, db + CRACK_THUD_DB) for s, db, *_ in CRACKS]
    air_blows = [(s, db) for s, _, db in JOLTS]
    return strike(thuds, CARCASS_MODES) + strike(air_blows, AIR_MODES)


def car():
    """Periodic firing hums and modulates the rumble and tread noise; tyre load adds a groan, grit ticks."""
    age, firing_db, drift, octave_db, rumble_db, tread_db, hiss_db = shots()
    gone, load_db = ramp(LEAVES_S, GONE_S), in_time(TYRE_LOAD)[0]
    hum, phase = engine(firing_db + drift * age, octave_db + GONE_UPPER_DB * gone)
    contact_db = TREAD_FOLLOWS_LOAD * load_db + GONE_TREAD_DB * ramp(TREAD_LIFTS_S, GONE_S)
    throbbing_db = rumble_db + np.minimum(load_db, 0) + GONE_RUMBLE_DB * gone + 0.42 * np.cos(phase)
    rumble = from_db(throbbing_db) * stereo_noise(RUMBLE_SPECTRUM)
    excess = np.sqrt(np.maximum(from_db(load_db) ** 2 - 1, 0))   # the load's power above the rumble's
    groan = from_db(rumble_db) * excess * stereo_noise(GROAN_SPECTRUM)
    rolling = from_db(tread_db + contact_db + 1.0 * np.cos(phase)) * stereo_noise(TREAD_SPECTRUM)
    grains = (rng.random(N) < 120 / SR) * rng.standard_normal((2, N))
    grit = from_db(GRIT_DB) * rms_one(colour(grains, HISS_SPECTRUM))
    hiss = from_db(hiss_db + contact_db) * (stereo_noise(HISS_SPECTRUM) + grit)
    return from_left(hum + rumble + groan + rolling + hiss)


def engine(firing_db, octave_db):
    """Periodic firing yields a tone and its orders; returns the sound and the firing phase."""
    phase = 2 * np.pi * np.cumsum(in_time(IDLE_SPEED)[0]) / SR
    orders = sum(from_db(db) * np.sin(k * phase + rng.uniform(0, 2 * np.pi)) for k, db in ENGINE_ORDERS)
    upper = np.sin(2 * phase) + orders
    return np.sqrt(2) * (from_db(firing_db) * np.sin(phase) + from_db(octave_db) * upper), phase


def shots():
    """Stepped levels: at every sample, the seconds since the current shot began and its row of values."""
    rows = np.array(SHOTS)
    start, *settings = rows[np.searchsorted(rows[1:, 0], TIME)].T
    return TIME - start, *settings


def puffs():
    """Turbulent pressure of each puff acts on the two microphones separately, partly in opposition."""
    swell = sum(from_db(db) * np.exp(-((TIME - s) / length * 2 - 1) ** 2) for s, length, db in PUFFS)
    mid, side = rms_one(colour(rng.standard_normal((2, N)), PUFF_SPECTRUM))
    return swell * (from_db(-3.5) * mid + side * [[1], [-1]])


def room(x, wet_db, scatter_db, scatter_t60, count=4):
    """Reflection under the car: overlapping stretches of sound meet echo patterns in rotation."""
    patterns = [echoes(wet_db, scatter_db, scatter_t60) for _ in range(count)]
    out, step = x.copy(), int(SHIFT_S * SR)
    fade = signal.get_window("hann", 2 * step)
    for k, start in enumerate(range(0, N - len(fade), step)):
        piece = x[:, start:start + len(fade)] * fade
        if np.abs(piece).max() > 1e-4:   # near-silent stretches get no echo
            add(out, start / SR, signal.fftconvolve(piece, patterns[k % count], axes=1))
    return out


def echoes(wet_db, scatter_db, scatter_t60):
    """Diffuse decay: quick scatter between wheel, sill and ground, and a tail that dies band by band."""
    t, response = TIME[:SR // 4], 0
    edges = np.geomspace(180, 17000, 10)
    for low, high in zip(edges, edges[1:]):
        hz = np.sqrt(low * high)
        band = signal.butter(2, [low, high], "band", fs=SR, output="sos")
        mid, side = signal.sosfilt(band, rng.standard_normal((2, len(t))))
        alike = np.clip(at_hz(LIKENESS, hz), 0, 1)
        noise = np.sqrt((1 + alike) / 2) * mid + np.sqrt((1 - alike) / 2) * side * [[1], [-1]]
        tail = from_db(wet_db - 60 * t / at_hz(REVERB_DECAY, hz))
        early = from_db(scatter_db - 60 * t / scatter_t60)
        envelope = (tail + early) * (1 - np.exp(-t / 0.0005))
        response = response + from_db(at_hz(REFLECTION, hz)) * noise * envelope
    return response


def strike(rows, modes):
    """Modal superposition: blows (s, dB) set the damped modes (Hz, dB, t60) of one body ringing."""
    out, t = np.zeros(N), TIME[:SR]
    ring = sum((-1) ** k * from_db(db - 60 * t / t60) * np.sin(2 * np.pi * hz * t)
               for k, (hz, db, t60) in enumerate(modes))
    for s, db in rows:
        add(out, s, from_db(db) * ring)
    return out


def stereo_noise(spectrum):
    """Partial coherence: shaped noise, alike in both ears in the bass and almost unrelated in the treble."""
    mid, side = rfft(rng.standard_normal((2, next_fast_len(N, True))))
    hz = np.linspace(0, SR / 2, len(mid))
    alike = np.clip(at_hz(LIKENESS, hz), 0, 1)
    pair = np.sqrt(1 + alike) * mid + np.sqrt(1 - alike) * side * [[1], [-1]]
    return rms_one(irfft(pair * from_db(at_hz(spectrum, hz)))[:, :N])


def from_left(x):
    """Interaural delay: sound from the left reaches the right ear later."""
    return np.array([x[0], np.interp(TIME - CAR_LAG_S, TIME, x[1])])


def lean(x, db):
    """Interaural level difference: shift a sound towards the left."""
    return x * from_db([[db], [-db]])


def colour(x, spectrum):
    """Linear filtering: multiply the spectrum of a sound by a smooth gain curve."""
    size = next_fast_len(x.shape[-1] + SR // 10)
    gain = from_db(at_hz(spectrum, np.fft.rfftfreq(size, 1 / SR)))
    return irfft(rfft(x, size) * gain, size)[..., :x.shape[-1]]


def at_hz(points, hz):
    """Logarithmic frequency: read a curve by linear interpolation over log Hz."""
    points = np.array(points)
    return np.interp(np.log(np.maximum(hz, 1)), np.log(points[:, 0]), points[:, 1])


def in_time(rows):
    """Linear interpolation in time: each column of a curve table at every sample."""
    s, *columns = np.transpose(rows)
    return [np.interp(TIME, s, c) for c in columns]


def ramp(from_s, to_s):
    """Linear transition: rises from 0 to 1 between two times."""
    return np.clip((TIME - from_s) / (to_s - from_s), 0, 1)


def add(out, s, sound):
    """Superposition: mix a short sound in at time s."""
    start = max(int(s * SR), 0)
    out[..., start:start + sound.shape[-1]] += sound[..., :N - start]


def from_db(db):
    """Decibels: convert a level to an amplitude ratio."""
    return 10 ** (np.asarray(db) / 20)


def rms_one(x):
    """Effective value: scale a signal to rms 1."""
    return x / np.sqrt(np.mean(x ** 2) + 1e-20)


def scene():
    """Superposition of all sources; all but the puffs are a little louder on the left."""
    plastic = lean(mask() + loose_pieces(), PLASTIC_LEAN_DB)
    return plastic + lean(packets() + tyre() + car(), CAR_LEAN_DB) + puffs()


def record(dry):
    """Saturation and band limiting: the tallest peaks are rounded and the top is cut."""
    rounded = .9 * np.tanh(dry / .9)
    return signal.sosfilt(signal.ellip(10, .1, 70, CUTOFF_HZ, fs=SR, output="sos"), rounded)


dry = scene()
out = record(dry)
file_out(out)
```